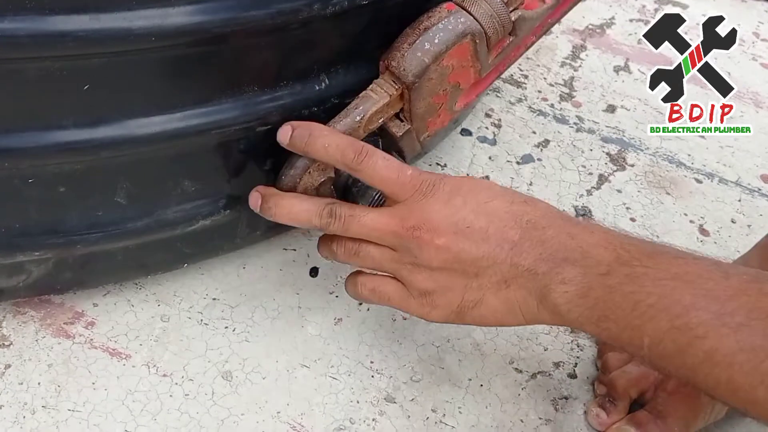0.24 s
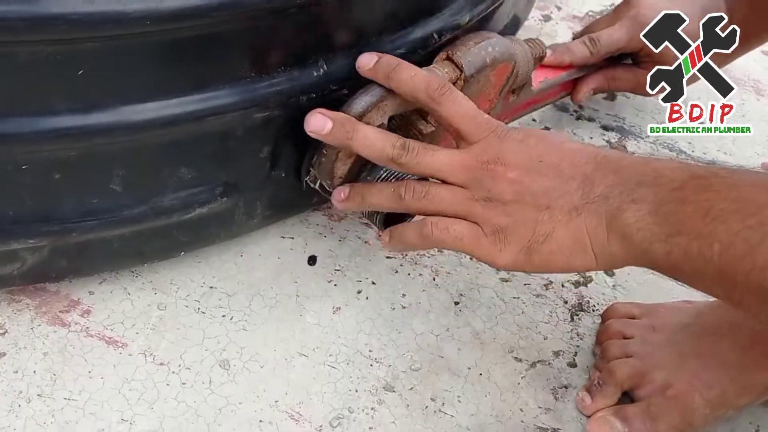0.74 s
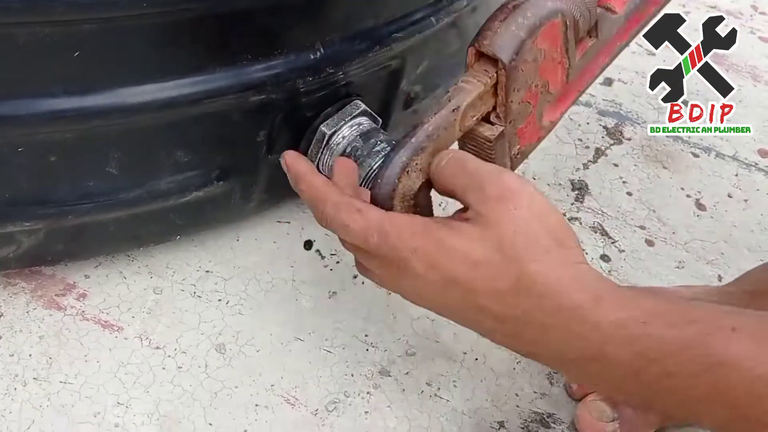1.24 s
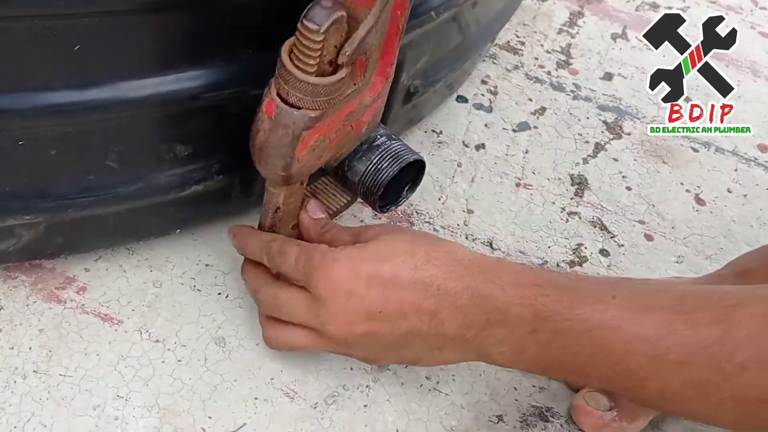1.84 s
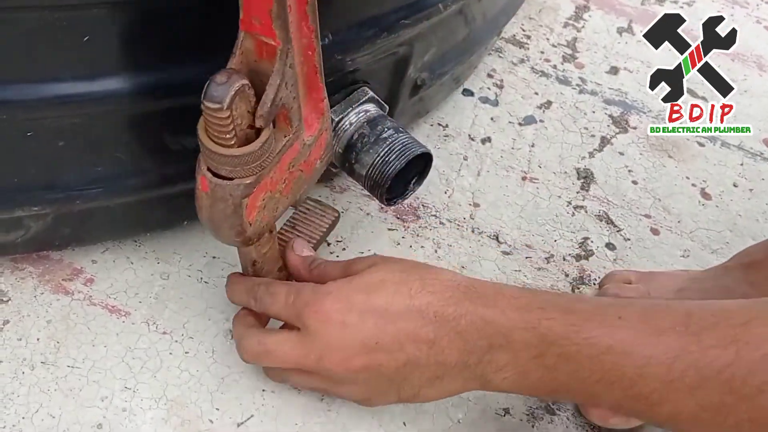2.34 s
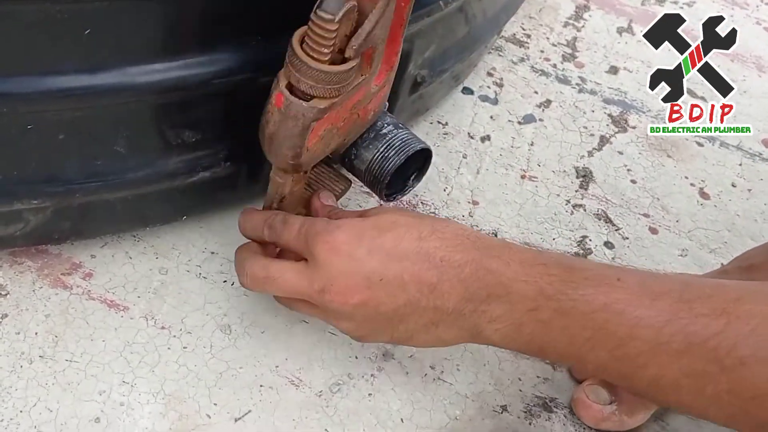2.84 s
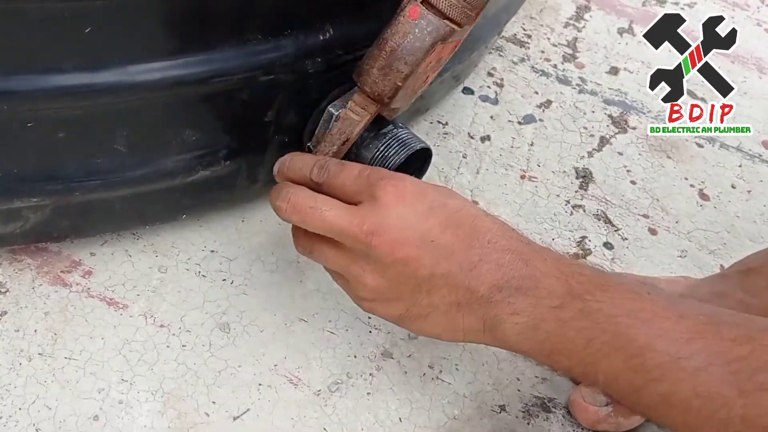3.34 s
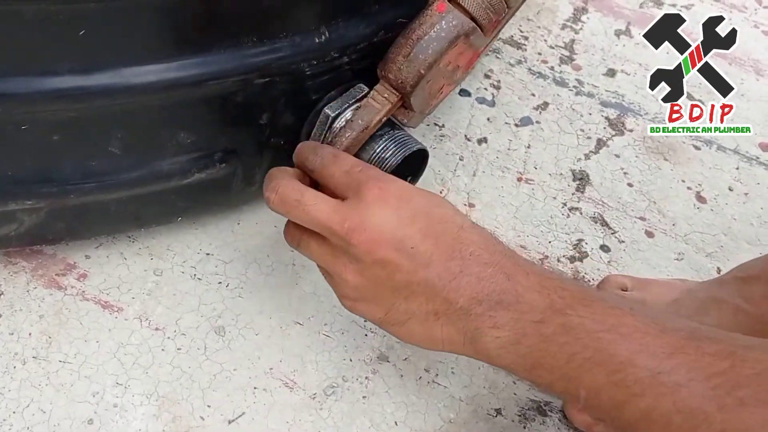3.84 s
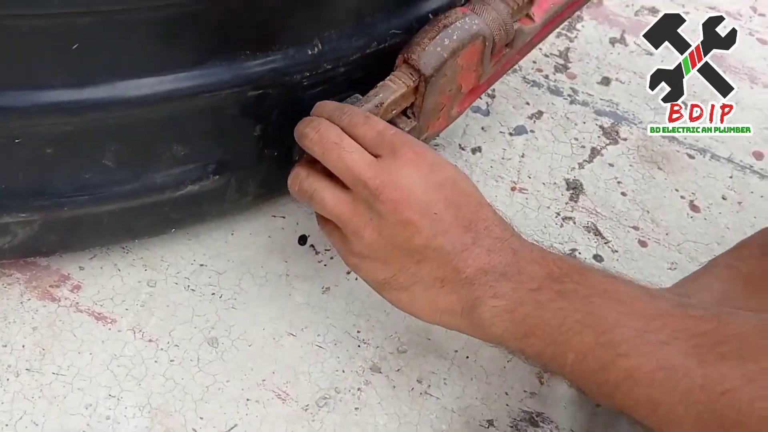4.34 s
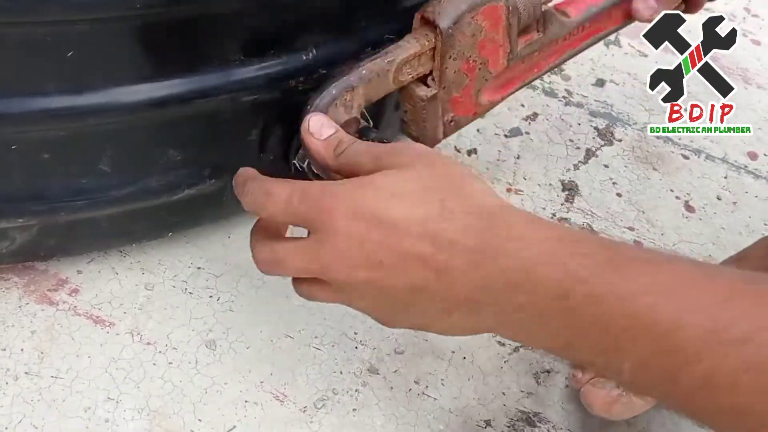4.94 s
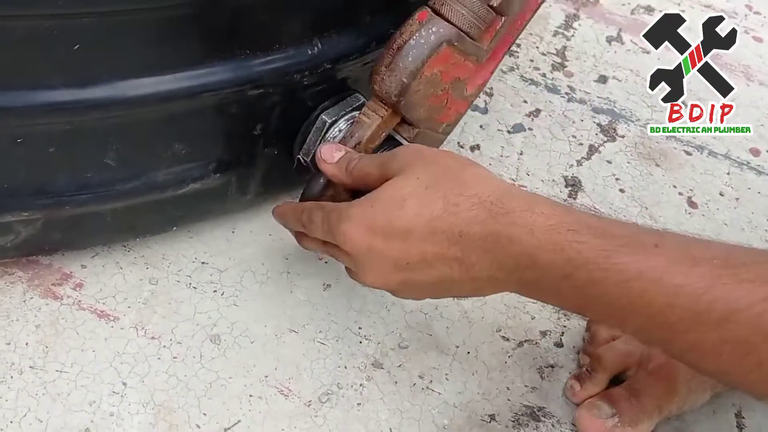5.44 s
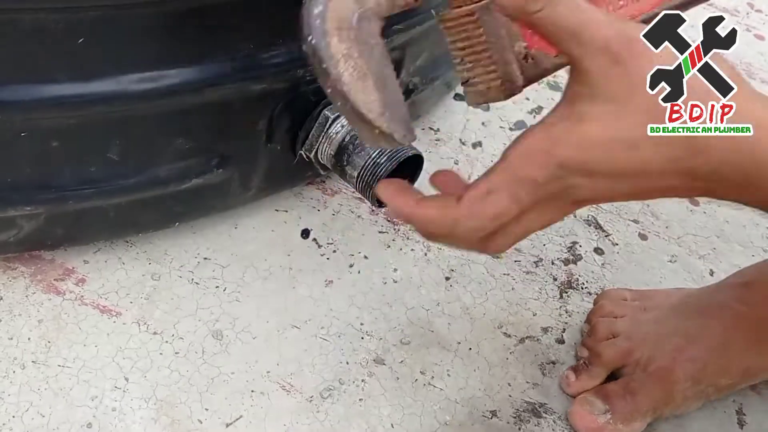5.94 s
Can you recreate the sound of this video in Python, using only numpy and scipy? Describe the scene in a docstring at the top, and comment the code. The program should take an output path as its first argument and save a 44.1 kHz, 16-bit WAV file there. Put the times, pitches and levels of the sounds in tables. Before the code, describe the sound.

Close to the microphone, in almost silent outdoor air, a heavy steel wrench works a fitting on an empty plastic tank. A small tap and scrape open, then soft low thumps until a hard double knock at 0.8-0.9 s, the loudest, with scraping, a bright jaw clink and hollow tank tones. Small taps and faint clinks follow to 1.7. A rasping drag leads to firm knocks at 2.0; gritty, rusty rubbing runs softly until about 3.9. A sharp knock with ringing clinks lands at 2.55. From 3.3 to 3.7 clacks and short scrapes crowd together. Lighter knocks and low hand rumbles are scattered from 4.1 to 5.4, one firmer at 4.9. A strong knock, low rumble and steely rattle come at 5.45, another low clack at 5.84, then a faint airy rub and tick after 6. Barely audible thin whistles pass near 2.1, 5.7 and 6.

```python
"""Hard knocks, clinks, short scrapes and gritty rubbing, close by, over hollow tones and very faint outdoor air.
A steel pipe wrench tightens a threaded fitting low on an empty plastic water tank; a hand rumbles on the tank.
Knocks are struck modes and banded noise for fitting and wall; the loose hook jaw clinks as buzz-driven steel modes.
Strokes and rubbing are stick-slip impulses in bands; all contacts are convolved with handle and tank responses.
Thin gliding tones whistle faintly; quiet moments are ducked and the top is cut."""
import sys
import numpy as np
from scipy import signal
from scipy.io import wavfile
from scipy.ndimage import uniform_filter1d

SR = 44100
rng = np.random.default_rng(int(sys.argv[2]) if len(sys.argv) > 2 else 0)


def file_out(sig):
    """Save sig as 16-bit WAV at sys.argv[1]."""
    # one column per channel
    cols = np.atleast_2d(sig).T
    # limit, then scale
    lim = np.clip(cols, -1, 1)
    pcm = np.round(lim * 32767).astype(np.int16)
    wavfile.write(sys.argv[1], SR, pcm)


N = 272538

TIME = np.arange(N) / SR
BAND_EDGES_HZ = 35 * 2 ** (np.arange(23) * .405)
BAND_HZ = np.sqrt(BAND_EDGES_HZ[1:] * BAND_EDGES_HZ[:-1])

# wrench landing on the fitting, relative levels:
# (time [s], first jaw [dB], thud of the wall [dB], grip pitch [Hz], second jaw [dB])
LANDINGS = [(0.004, -45.5, -45, 1640, -56), (0.531, -76, -50, 396, -80), (0.681, -82, -56, 290, -88),
            (0.786, -51, -43, 373, -58), (0.8106, -31.5, -29, 290, -35), (0.9104, -20.5, -29, 1542, -44),
            (1.051, -51, -54, 1600, -72), (1.109, -57, -48, 540, -70), (1.388, -63, -61, 492, -74),
            (1.694, -44, -60, 900, -41), (1.983, -33, -32, 1630, -50), (2.011, -36, -54, 928, -56),
            (2.192, -48, -65, 970, -60), (2.41, -85, -55, 360, -90), (2.5552, -24.5, -34, 1350, -31),
            (2.937, -62, -52, 328, -68), (3.036, -45, -51, 1010, -58), (3.3, -43.5, -64, 1058, -62),
            (3.371, -35, -37.5, 816, -48), (3.481, -54, -48, 450, -65), (3.563, -39, -44, 476, -41),
            (3.592, -40, -41, 346, -48), (3.616, -38, -42, 900, -45), (3.71, -45.5, -47.5, 340, -58),
            (4.076, -53, -53, 890, -60), (4.173, -39, -52, 421, -50), (4.491, -52, -52, 322, -60),
            (4.615, -63, -55, 360, -69), (4.707, -58, -48, 1230, -68), (4.764, -42, -50, 1200, -48),
            (4.917, -36, -42.5, 338, -43), (5.152, -47, -55, 420, -45), (5.365, -41, -49, 982, -46),
            (5.4512, -24.5, -35, 870, -36), (5.786, -46, -55, 826, -56), (5.8356, -30, -35, 340, -56),
            (6.151, -60, -80, 1370, -72)]
# colour of sliding contact: (frequency [Hz], relative level per band [dB])
SLIDING_COLOUR = [(45, -29.5), (110, -1), (200, -3.5), (400, -3), (650, -8.5), (930, 3.5), (1250, 1),
                  (1650, 2.5), (2200, 3.5), (3000, 3.5), (4200, 0.5), (6000, -15.5), (7300, -15.5),
                  (9500, -30.5), (15000, -28.5)]

THUD_BELOW_HZ, EDGE_ABOVE_HZ = 314, 1864
USUAL_GRIP_HZ = 600
SECOND_JAW_S = 0.013   # usual delay after the first jaw


def from_db(db):
    """Decibels to gain."""
    return 10 ** (np.asarray(db) / 20)


def rms_one(x):
    """Scale to unit power."""
    return x / np.sqrt(np.mean(x ** 2, axis=-1, keepdims=True) + 1e-20)


def at_hz(table, hz):
    """Interpolate a table's columns over log frequency."""
    table_hz, *columns = np.transpose(table)
    return [np.interp(np.log(hz), np.log(table_hz), column) for column in columns]


def band(x, index):
    """One band of the filter bank, applied twice for steep sides."""
    edges_hz = BAND_EDGES_HZ[index:index + 2] * [.95, 1.05]   # slight overlap
    sos = signal.butter(2, edges_hz, "band", fs=SR, output="sos")
    return signal.sosfilt(np.vstack([sos, sos]), x)


def add(out, sounds, times_s):
    """Mix each sound in at its time."""
    for sound, s in zip(sounds, times_s):
        i = max(0, round(s * SR))
        out[i:i + len(sound)] += sound[:N - i]


def ring(t, hz, t60_s):
    """A struck mode: a sine falling 60 dB in t60."""
    return np.sin(2 * np.pi * hz * t) * from_db(-60 * t / t60_s)


def drift(points_per_s):
    """Slow chance: straight lines between unit-spread random points."""
    return np.interp(TIME * points_per_s, np.arange(2000), rng.standard_normal(2000))


def contact_gain(hz, thud_db, mid_db, edge_db):
    """A heavy push feeds the bass, a hard sharp touch the treble."""
    low = 1 / (1 + (hz / THUD_BELOW_HZ) ** 4)
    high = 1 / (1 + (EDGE_ABOVE_HZ / hz) ** 6)
    return from_db(low * thud_db + high * edge_db + (1 - low - high) * mid_db)


def grip_octaves(hz):
    """Octaves of a contact's pitch above the usual grip."""
    return np.log2(hz / USUAL_GRIP_HZ)


def air():
    """Still outdoor air: very faint, even banded noise."""
    # (frequency [Hz], level per band [dB])
    air_spectrum = [(30, -82.5), (60, -83), (110, -88), (250, -99), (1000, -90.5), (3000, -100.5),
                    (6000, -104), (15000, -104)]
    white = rng.standard_normal((2, N))
    out = np.zeros(N)
    for k, hz in enumerate(BAND_HZ):
        out += from_db(at_hz(air_spectrum, hz)[0]) * rms_one(band(white[k % 2], k))
    return out


def whistles(waver_hz=45):
    """Thin, slightly unsteady tones that glide, swell and fade."""
    # (start [s], end [s], first pitch [Hz], last pitch [Hz], peak level [dB])
    glides = [(2.04, 2.17, 3200, 3140, -79), (5.66, 5.82, 3020, 2800, -81), (5.98, 6.04, 2930, 2980, -79)]
    out = np.zeros(N)
    for start, end, first_hz, last_hz, db in glides:
        hz = np.interp(TIME, [start, end], [first_hz, last_hz]) + waver_hz * drift(200)
        swell = np.sin(np.pi * np.clip((TIME - start) / (end - start), 0, 1))
        out += from_db(db) * swell * np.sin(2 * np.pi * np.cumsum(hz) / SR)
    return out


def tank(x, hollow_db=-58, echo_db=-53):
    """The enclosed air answers the wall with long hollow tones and a dense echo."""
    # hollow tones: (frequency [Hz], relative level [dB], t60 [s])
    air_modes = [(65, -7, .7), (96.5, -8.5, 0.65), (114.46, -4.5, 0.38), (126.43, -6.5, .5),
                 (173, -9, 0.16), (265, -15, 0.3), (318, -15.5, 0.45), (353.4, -10.5, .45),
                 (443.6, -2.5, 0.41), (547.3, 1, 0.39), (675, -8.5, .52), (650, -5.5, 0.22),
                 (720, -2.5, 0.44), (790, -8.5, 0.18), (1030, -7, 0.26), (1050, -14, 0.56)]
    # dense echo: (frequency [Hz], relative level per band [dB], t60 [s])
    echo_bands = [(58.83, -23, 0.36), (120, -15, 0.38), (387, -6, 0.23), (1060, -8.5, 0.33),
                  (1706, -7.5, 0.27), (2620, -11, 0.2), (6000, -6.5, 0.08), (15000, 1, 0.14)]
    t = TIME[:SR]
    answer = sum(from_db(hollow_db + db) * ring(t, hz, t60) for hz, db, t60 in air_modes)
    for k, hz in enumerate(BAND_HZ):
        db, t60 = at_hz(echo_bands, hz)
        noise = rms_one(band(rng.standard_normal(len(t)), k))
        answer = answer + from_db(echo_db + db - 60 * t / t60) * noise
    return signal.fftconvolve(x, answer)[:N]


def handle(x, level_db=-72, spread=.05, count=20):
    """Every contact leaks into the long handle, whose close mode clusters blur into a faint rough tail."""
    # cluster centres: (frequency [Hz], relative level [dB], t60 [s])
    handle_modes = [(2600, -5.5, 0.083), (2930, -2, .3), (3100, -4, 0.16), (4210, 1, .3), (4430, -3.5, 0.2),
                    (5430, -3, .28), (6450, -3.5, 0.17), (6680, -1.5, .32)]
    t, answer = TIME[:SR // 2], 0
    for hz, db, t60 in handle_modes:
        cluster_hz = hz * (1 + spread * rng.standard_normal((count, 1)))
        signs = rng.choice([-1, 1], (count, 1))
        answer = answer + from_db(level_db + db) * np.sum(signs * ring(t, cluster_hz, t60), axis=0)
    return signal.fftconvolve(x, answer)[:N]


def slips(per_s, spread_db):
    """Stick and slip: a stream of tiny uneven releases."""
    sizes = from_db(spread_db * np.minimum(rng.exponential(1, N), 4)) * rng.choice([-1, 1], N)
    return sizes * (rng.random(N) < per_s / SR) + 1e-18


def rubbing(level_db=-5, fade_s=.05, catch_db=2.5, patchy_db=0.7, coarse_above_hz=2000,
            thud_db=-2, rub_db=-0.5, grit_db=2):
    """Fine grit crunches under the slowly turning rusty steel; coarser grains crackle in the treble."""
    # relative levels: (time [s], bass [dB], middle [dB], treble [dB])
    rub_levels = [(2.05, -53, -63, -81), (2.214, -70, -70, -81), (2.472, -69, -72, -81),
                  (2.584, -57, -65, -79), (2.648, -57, -63, -74), (2.758, -63, -68, -74),
                  (2.992, -63, -67, -75), (3.16, -56, -62, -72), (3.552, -51, -59, -76),
                  (3.648, -52, -65, -83), (3.816, -70, -88, -91), (3.95, -71, -91, -97)]
    s, thud, mid, edge = np.transpose(rub_levels)
    fine, coarse = slips(per_s=5500, spread_db=4.5), slips(per_s=630, spread_db=1.5)
    out, catching_db = 0, catch_db * drift(45)   # common to all bands
    for k, hz in enumerate(BAND_HZ):
        gains = contact_gain(hz, thud + thud_db, mid + rub_db, edge + grit_db)
        pressure = np.exp(np.interp(TIME, s, np.log(gains)))
        colour_db = at_hz(SLIDING_COLOUR, hz)[0] + catching_db + patchy_db * drift(25)
        grains = coarse if hz > coarse_above_hz else fine
        out = out + pressure * from_db(level_db + colour_db) * rms_one(band(grains, k))
    fade = np.clip(1 + np.minimum(TIME - s[0], s[-1] - TIME) / fade_s, 0, 1)
    return out * fade


def strokes(stroke_thud_db=-3, thud_db_per_octave=-5,
            skid_s=0.02, skid_db=-4.5, skid_thud_db=-6, skid_edge_db=-36):
    """Listed strokes plus a short skid per knock: (start s, end s, thud dB, level dB, hard edge dB, pitch Hz)."""
    # drags over the fitting, with a few low rumbles of a hand on the tank and a last airy rub, relative levels:
    # (start [s], end [s], level [dB], hard edge [dB], pitch [Hz])
    listed = [(0.02, 0.05, -52, -88, 300), (0.09, 0.203, -68, -82, 340), (0.385, 0.43, -72, -84, 475),
              (0.51, 0.575, -66, -110, 130), (0.8, 0.84, -35, -60, 250), (0.838, 0.885, -41, -75, 180),
              (0.88, 0.92, -35, -58, 376), (1.227, 1.268, -68, -95, 980), (1.465, 1.5, -78, -105, 110),
              (1.868, 1.984, -45, -77, 900), (2.135, 2.219, -51, -71, 990), (2.45, 2.548, -45, -87, 950),
              (2.733, 2.77, -50, -60, 950), (3.122, 3.186, -55, -62, 290), (3.531, 3.573, -49, -76, 646),
              (3.564, 3.64, -42, -58, 400), (3.638, 3.722, -48, -71, 315), (4.066, 4.172, -59, -100, 90),
              (4.8, 4.912, -66, -105, 100), (5.376, 5.435, -55, -110, 330), (5.462, 5.5, -38, -52, 85),
              (6.05, 6.18, -76, -71, 1400)]
    rows = []
    for start, end, db, edge, hz in listed:
        thud = db + stroke_thud_db + thud_db_per_octave * grip_octaves(hz)
        rows.append((start, end, thud, db, edge, hz))
    for s, first_db, thud, hz, db in LANDINGS:
        start = s + SECOND_JAW_S
        skid_thud = thud + db - first_db + skid_thud_db
        rows.append((start, start + skid_s, skid_thud, db + skid_db, db + skid_edge_db, hz))
    return rows


def scrapes(swell_db=2.0, level_db=-7, tone_db=-6, tone_q=6, fade_s=0.0033, fade_share=.3):
    """Drags, skids, hand rumbles and an airy rub: stick-slip judder that resonates at each stroke's own pitch."""
    out, judder = np.zeros(N), slips(per_s=1700, spread_db=2.5)
    bands = [band(judder, k) for k in range(len(BAND_HZ))]
    colour = from_db(level_db + at_hz(SLIDING_COLOUR, BAND_HZ)[0])
    for start, end, thud, mid, edge, hz in strokes():
        on = slice(max(0, int((start - fade_s) * SR)), int((end + fade_s) * SR))
        tone = signal.lfilter(*signal.iirpeak(hz, tone_q / 2, fs=SR), judder[on])
        tone = signal.lfilter(*signal.iirpeak(hz, tone_q, fs=SR), tone)
        sound = from_db(mid + tone_db) * rms_one(tone)
        gains = contact_gain(BAND_HZ, thud, mid, edge) * colour
        sound = sound + sum(g * rms_one(b[on]) for g, b in zip(gains, bands))
        sound = sound * from_db(swell_db * np.linspace(-1, 1, len(sound)))   # each stroke grows as it goes
        out[on] += sound * signal.windows.tukey(len(sound), fade_share)
    return out


def chatter(modes, db, pitch_hz, buzz, buzz_s, favour_db=9, favour_octaves=0.14, split=0.013):
    """A buzzing touch rings a set of modes; the point of contact favours those near one pitch."""
    t, sound = TIME[:SR // 5], 0
    touch = buzz * rng.standard_normal(len(t)) * np.exp(-t / buzz_s)
    touch[0] = 1
    for hz, mode_db, t60 in modes:
        near = np.exp(-(np.log2(hz / pitch_hz) / favour_octaves) ** 2)
        # jaw and frame couple: two shorter-lived neighbours per mode, shifted anew at each touch
        neighbours_hz = hz * (1 + split * rng.standard_normal((2, 1)))
        mode = ring(t, hz, t60) + ring(t, neighbours_hz, t60 / 2).sum(axis=0)
        gain = from_db(mode_db + favour_db * near + rng.normal(0, 3))
        sound = sound + gain * rms_one(signal.fftconvolve(touch, mode)[:len(t)])
    return from_db(db) * rms_one(sound)


def clinks(ring_db=-8, shimmer_db=-9, shimmer_hz=11450, dull_above_hz=6900, favour_db=18,
           drop_back_s=0.04, drop_back_db=-20, seat_hz=2000, jolt_db=-33):
    """The loose hook jaw rattles on its frame and rings, then drops back; each knock also jolts it on its seat."""
    # relative levels: (time [s], ring [dB], main pitch [Hz], shimmer [dB])
    throws = [(0.564, -78, 2000, -105), (0.9098, -35, 2270, -62), (1.05, -61, 1946, -105),
              (1.117, -67, 1860, -81), (1.24, -76, 2000, -105), (1.289, -71, 5380, -102),
              (1.35, -68, 3890, -103), (1.703, -64, 4100, -105), (2.547, -51, 2600, -91),
              (2.562, -41, 5060, -61), (2.598, -55, 5370, -82), (3.146, -61.5, 2810, -81),
              (3.705, -64, 2290, -95), (3.911, -75.5, 4136, -105), (4.15, -73, 1970, -105),
              (4.755, -65, 1990, -105), (4.991, -74, 2700, -104), (5.114, -73, 1980, -105),
              (5.288, -75, 2010, -105), (5.4632, -39, 4560, -57), (5.48, -40, 3840, -45),
              (5.732, -72.5, 1980, -105), (5.79, -64, 4560, -87), (5.859, -44, 4250, -64),
              (5.875, -55, 3640, -70), (6.103, -69, 2190, -92)]
    # wrench steel: (frequency [Hz], relative level [dB], t60 [s])
    steel_modes = [(2000, 6.5, 0.032), (2834, -9, .08), (3550, -1, 0.025), (3875, 5.5, 0.039),
                   (4470, -1, 0.1), (4720, -7, 0.036), (5660, -0.5, 0.034), (6160, -3.5, 0.032),
                   (6300, -8.5, 0.088), (7100, -15, 0.03), (7900, -22.5, 0.034)]
    # its highest modes: (frequency [Hz], relative level [dB], t60 [s])
    shimmer_modes = [(10670, -2.5, 0.036), (11370, 5.5, .055), (12470, -10, .045), (14400, -13, .08),
                     (15470, 3, .05)]
    body, top = np.zeros((2, N))
    touches = [(s, db + jolt_db, seat_hz) for s, db, *_ in LANDINGS]
    for s, db, hz, top_db in throws:
        touches += [(s, db, hz), (s + drop_back_s, db + drop_back_db, seat_hz)]
        shimmer = chatter(shimmer_modes, top_db + shimmer_db, shimmer_hz, buzz=.4, buzz_s=.004, favour_db=3)
        add(top, [shimmer], [s])
    for s, db, hz in touches:
        clink = chatter(steel_modes, db + ring_db, hz, buzz=0.53, buzz_s=0.0071, favour_db=favour_db)
        add(body, [clink], [s])
    return signal.sosfilt(signal.butter(4, dull_above_hz, fs=SR, output="sos"), body) + top


def jaw_touches(second_thud_db=-1, delay_scatter=0.15, usual_db=-40,
                edge_db=-25, edge_db_per_octave=5, edge_db_per_db=0.4):
    """Both jaws of every knock, harder when higher or stronger: (s, knock dB, thud dB, hard edge dB, grip Hz)."""
    rows = []
    for s, first_db, thud, hz, second_db in LANDINGS:
        second_thud = thud + second_db - first_db + second_thud_db
        delay_s = SECOND_JAW_S * (1 + delay_scatter * rng.standard_normal())
        for start, db, thud_db in (s, first_db, thud), (s + delay_s, second_db, second_thud):
            hardness_db = edge_db + edge_db_per_octave * grip_octaves(hz) + edge_db_per_db * (db - usual_db)
            rows.append((start, db, thud_db, db + hardness_db, hz))
    return rows


def knocks(crack_db=4, wall_db=-5, grip_db=3, grip_t60_s=0.038, thud_db=1, edge_db=5,
           build_cycles=.8, contact_s=0.00025, punch_db=12, punch_cycles=7):
    """Each knock rings the grip and the fitting briefly, then spreads through the wall, the bass last."""
    # fitting and the wall around it: (frequency [Hz], relative level [dB], t60 [s])
    fitting_modes = [(84, -8, 0.09), (130.35, -2.5, 0.28), (200.2, -2, 0.086), (282, -4, 0.033),
                     (378, -13, 0.059), (476, -6, 0.035), (710, -5, 0.018), (876, 5, 0.016),
                     (1176, -1, 0.013), (1606, -3, 0.025), (2780, 3.5, 0.004), (4080, -4, 0.0068),
                     (5750, -15, 0.01)]
    # flexing plastic wall: (frequency [Hz], relative level per band [dB], t60 [s])
    wall_bands = [(44.7, -26.5, 0.082), (68.65, -12, 0.23), (110, 5, 0.18), (200.7, 3.5, 0.04),
                  (326.3, -2, 0.13), (625, -0.5, 0.059), (960, 0.5, 0.07), (1663, 0.5, .05),
                  (2200, -3.5, 0.052), (3840, 0, 0.032), (5756, -9, 0.013), (8500, -28, 0.013),
                  (15000, -29.5, .03)]
    s, mid, thud, edge, grip_hz = np.transpose(jaw_touches())[:, :, None]   # one row per touch
    t = TIME[:SR // 4]

    def gain(hz):
        """Contact gain of every touch at one frequency."""
        return contact_gain(hz, thud + thud_db, mid, edge + edge_db)

    hits = from_db(mid + grip_db) * ring(t, grip_hz, grip_t60_s)
    # the first swings are much the widest
    hits = hits + from_db(mid + punch_db) * ring(t, grip_hz, punch_cycles / grip_hz)
    for k, (hz, db, t60) in enumerate(fitting_modes):
        mode_gain = from_db(crack_db + db + 2 * rng.standard_normal(s.shape))
        hits = hits + (-1) ** k * gain(hz) * mode_gain * ring(t, hz, t60)
    hits = hits * (1 - np.exp(-(t / contact_s) ** 2)) ** 2   # the plastic yields, rounding the first instant
    white = rng.standard_normal((2, len(s), len(t)))
    for k, hz in enumerate(BAND_HZ):
        db, t60 = at_hz(wall_bands, hz)
        envelope = from_db(-60 * t / t60) * (1 - np.exp(-t * hz / build_cycles))
        flex = rms_one(band(white[k % 2], k) * envelope) * np.sqrt(np.mean(envelope ** 2))
        hits = hits + gain(hz) * from_db(wall_db + db) * flex
    out = np.zeros(N)
    add(out, hits, s[:, 0])
    return out


def scene(lowest_hz=58):
    """Every contact also sounds the handle and the tank, which radiates no deep bass."""
    work = rubbing() + scrapes() + clinks() + knocks()
    work = signal.sosfilt(signal.butter(4, lowest_hz, "high", fs=SR, output="sos"), work)
    return (air() + whistles() + tank(work) + handle(work) + work)[None]


def record(dry, threshold_db=-74, depth_db=-14, window_s=0.018, cutoff_hz=16000):
    """A noise suppressor ducks the quietest moments; the top is cut steeply."""
    power = np.abs(uniform_filter1d(dry ** 2, int(window_s * SR)))
    shut = 1 / (1 + (power / from_db(threshold_db) ** 2) ** 2)   # 0 open, 1 fully ducked
    ducked = dry * from_db(depth_db * shut)
    return signal.sosfilt(signal.ellip(10, .1, 70, cutoff_hz, fs=SR, output="sos"), ducked)


dry = scene()
out = record(dry)
file_out(out)
```